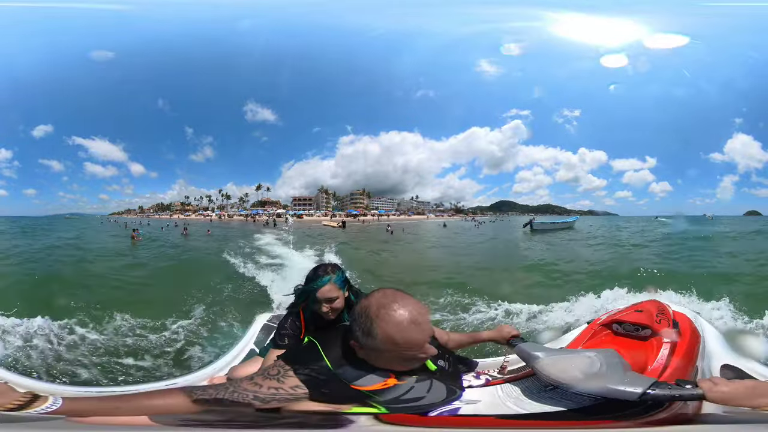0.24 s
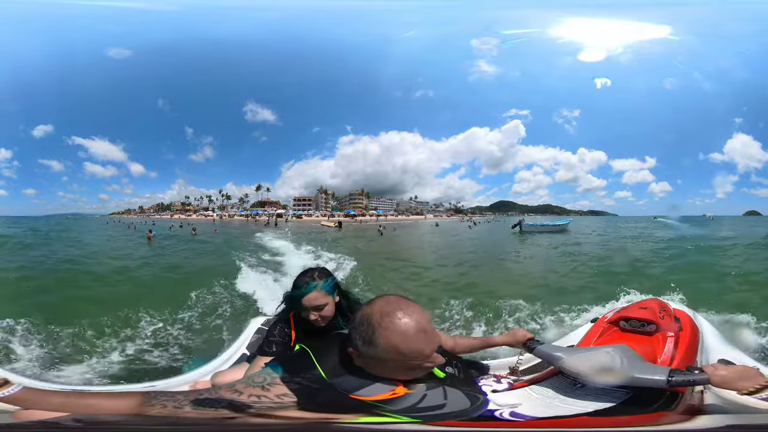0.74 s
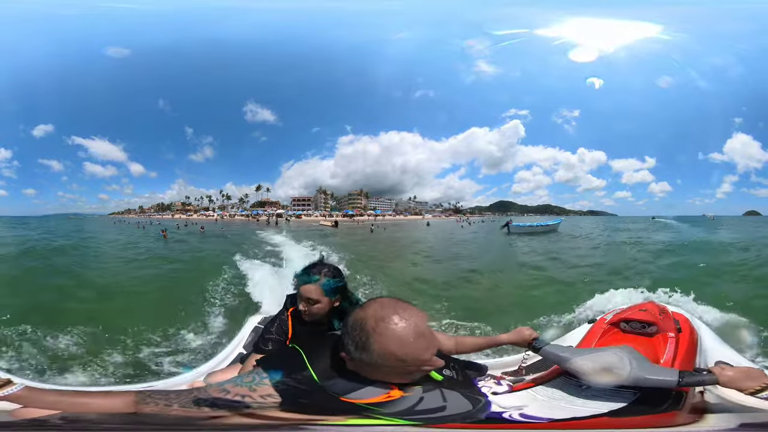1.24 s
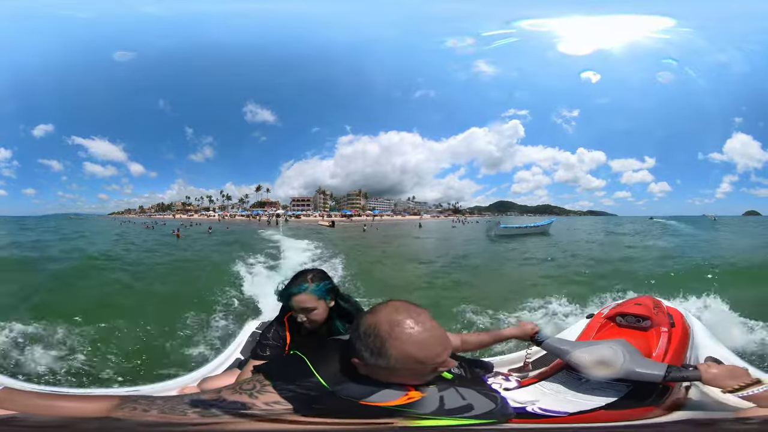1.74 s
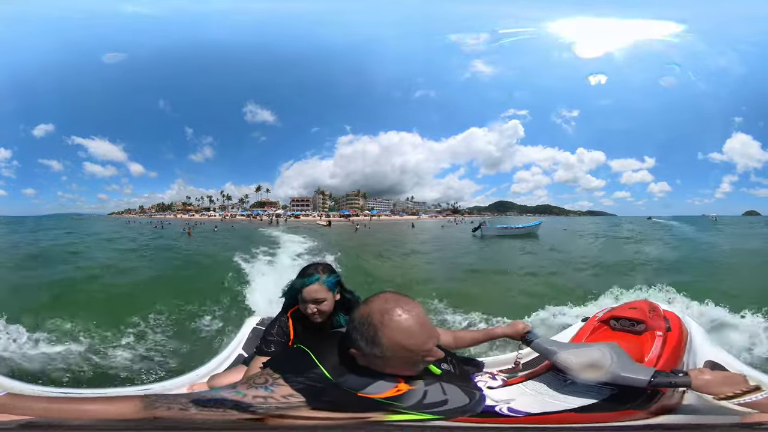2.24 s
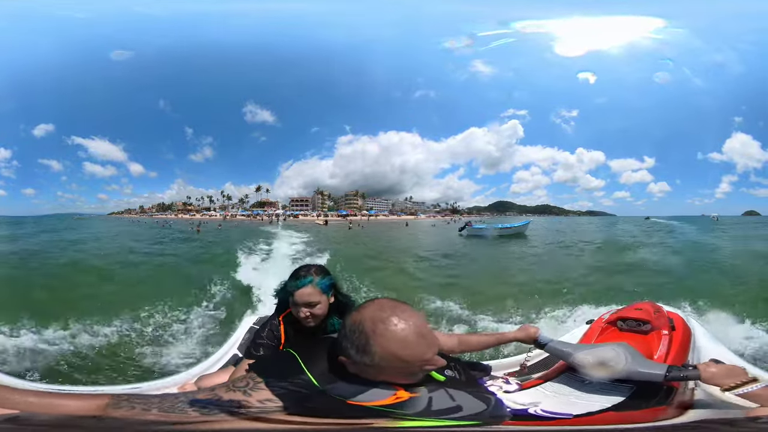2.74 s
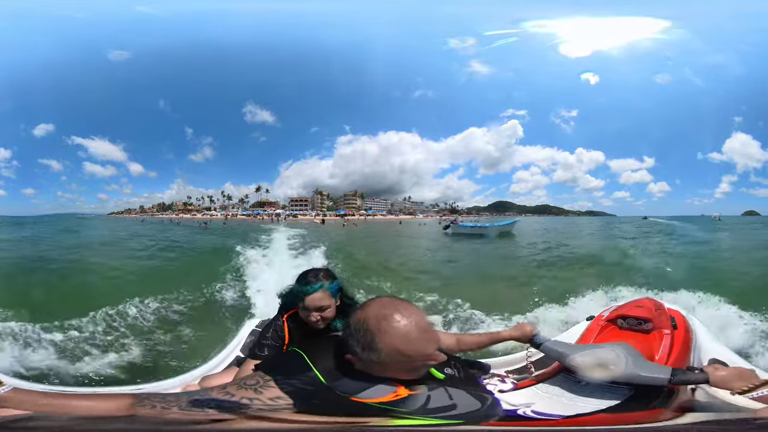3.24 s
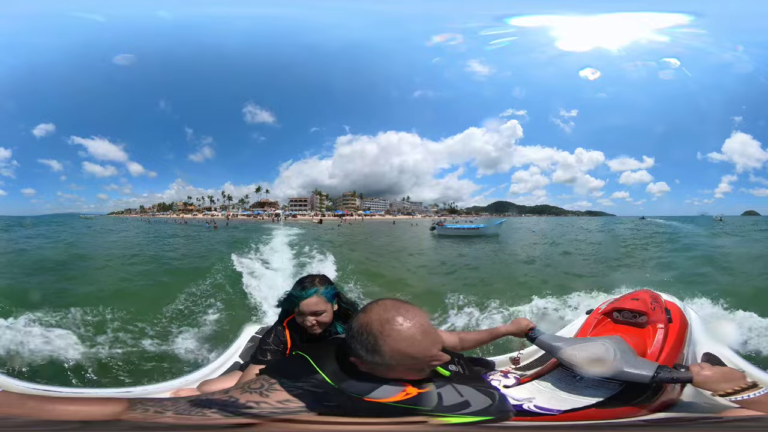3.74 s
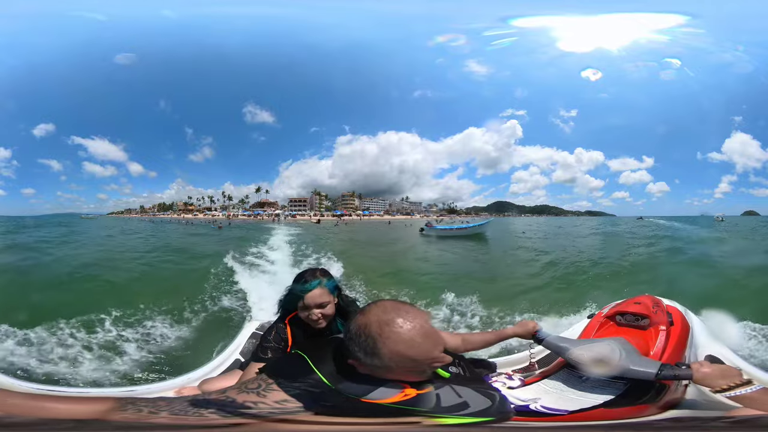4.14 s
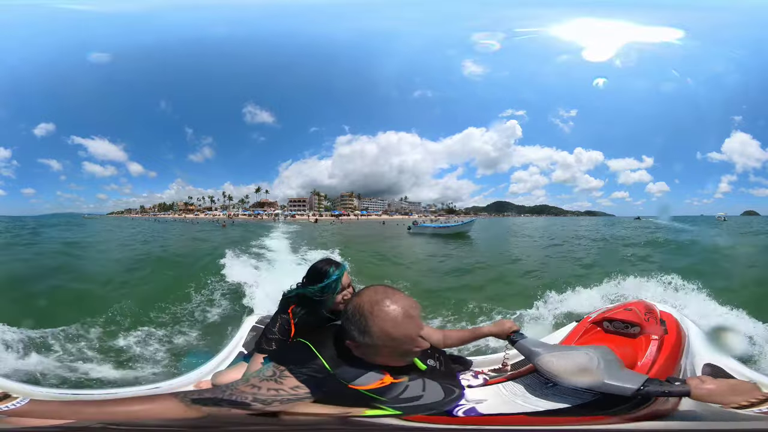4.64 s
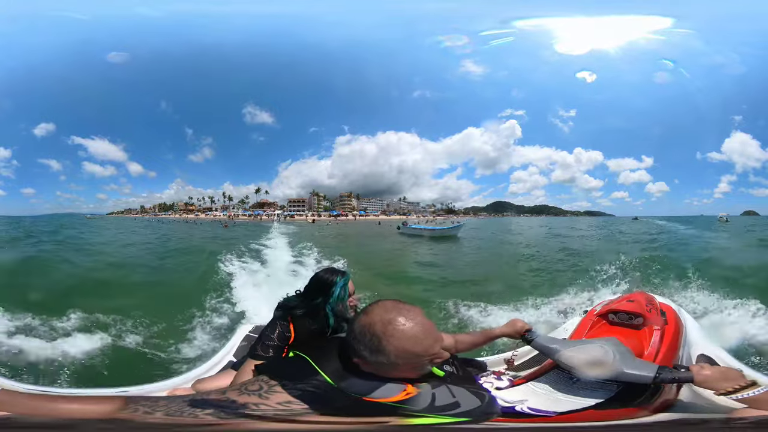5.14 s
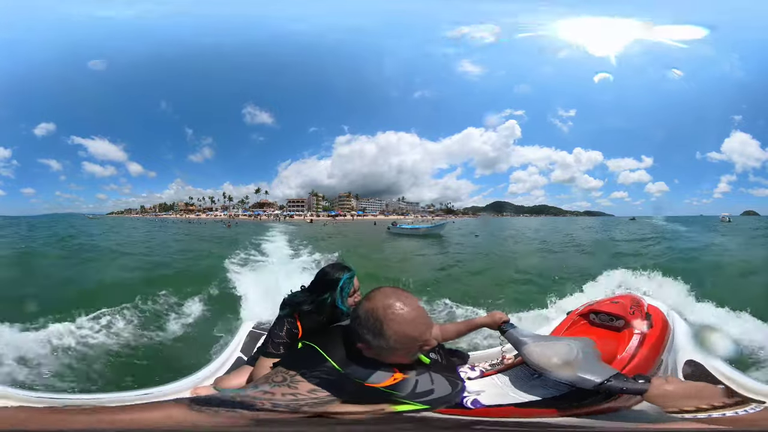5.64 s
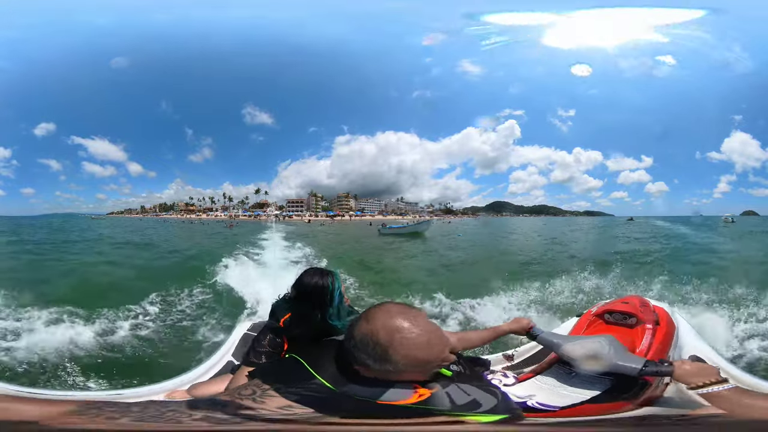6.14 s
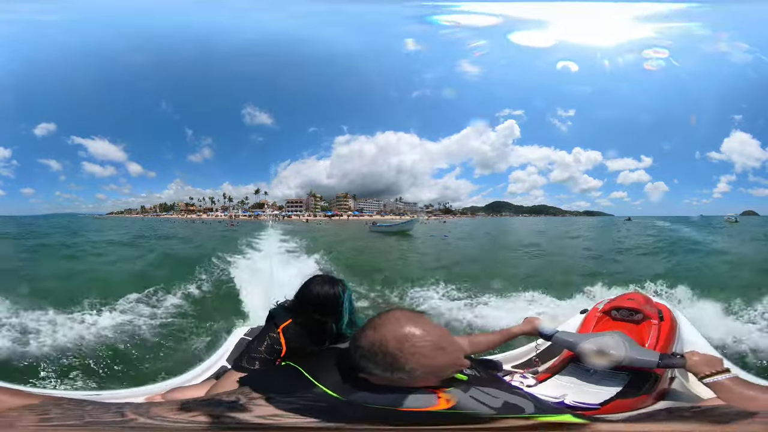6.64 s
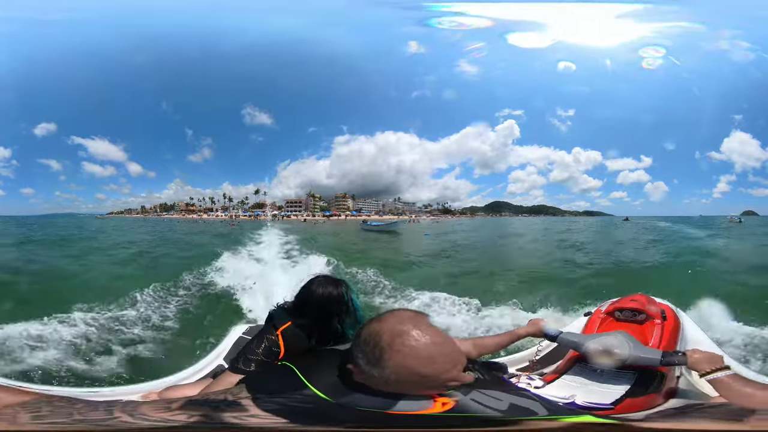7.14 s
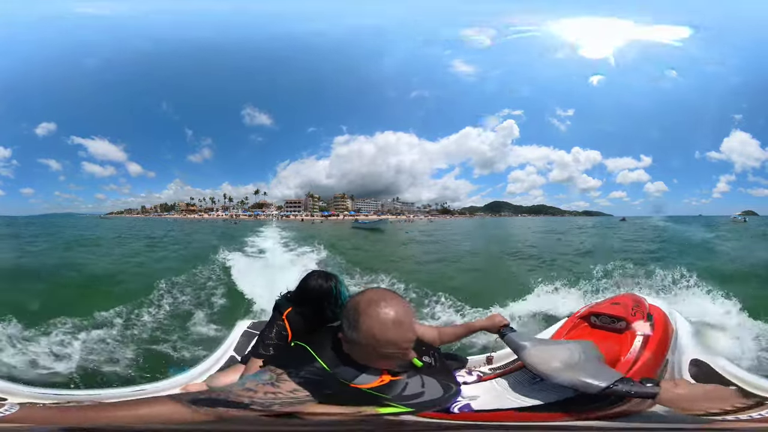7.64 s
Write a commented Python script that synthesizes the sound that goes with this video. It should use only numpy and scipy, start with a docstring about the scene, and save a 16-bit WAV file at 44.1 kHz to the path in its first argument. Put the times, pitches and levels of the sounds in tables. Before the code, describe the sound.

Jet ski speeding across an open bay, gusty wind thumping the microphone, then a strong wavering engine hum over roaring wash and hissing spray.

```python
"""A jet ski at speed on an open bay, heard by a small camera held over the seat.
It opens gusty: wind pops and thumps the open microphone, faint squeaks glide, and the hum soon all but vanishes.
The hum returns, then the camera changes to its sheltered microphone: the hum comes forward, the treble gets a hollow.
From there a thin whine, gurgles and hull rings join in, with brief dips in the hum and droplets close by.
Throughout, sines follow the engine speed; shaped noise makes the buffeting wind, roaring wash and hissing spray."""
import sys
import numpy as np
from scipy import signal
from scipy.fft import rfft, irfft, next_fast_len
from scipy.io import wavfile
from scipy.ndimage import uniform_filter1d

SR = 44100
rng = np.random.default_rng(int(sys.argv[2]) if len(sys.argv) > 2 else 0)


def output_pcm(signal):
    """Save a mono or channel-first signal as 16-bit PCM at the path in sys.argv[1].

    Samples are clipped to [-1, 1] before scaling.
    """
    pcm = np.clip(np.atleast_2d(signal).T, -1, 1) * 32767
    wavfile.write(sys.argv[1], SR, np.round(pcm).astype(np.int16))


N = 347508
T = np.arange(N) / SR
CHANGE_S = (2.36, 2.64)  # start and end of the change from the open to the sheltered microphone

# All levels in dB are those ahead of the camera's gain control.
# Wind on the microphone: start_s, buffeting_db, rumble_over_buffeting_db
WIND = [(0.0, -33.5, 1.5), (0.35, -31.5, 4.5), (0.9, -31, 2), (1.7, -28.5, 2.5), (2.3, -33.5, 1.5),
        (2.6, -27.5, -7), (3.3, -27.5, -3), (3.9, -28, -5), (4.4, -26, 0), (4.8, -26, -1), (5.4, -29, -1.5),
        (5.65, -25.5, -7), (6.0, -29, -6), (7.0, -27.5, -1.5), (7.88, -29, -3)]
# The hull cuts a wave and throws water: peak_s, spray_db, wash_db, rise_db_per_s, fall_db_per_s (spray slopes)
SPLASHES = [(0.091, -50.5, -42, 78, 16.5), (0.38, -57, -44.5, 16, 117), (0.67, -52, -51.5, 26, 31),
            (1.11, -50.5, -42.5, 36, 75), (1.26, -50, -45, 194, 81), (1.54, -50, -43, 35, 13.5),
            (1.97, -61.5, -60, 54, 75), (2.332, -50, -54.5, 79, 72), (2.5, -52.5, -41.5, 45, 43),
            (2.76, -51, -38.5, 38, 56), (3.15, -53.5, -38, 18.5, 51), (3.42, -49, -38, 96, 58),
            (3.86, -52.5, -36.5, 27.5, 29), (4.4, -55.5, -42.5, 16, 41), (4.89, -48, -34, 30.5, 46.5),
            (5.25, -48.5, -36.5, 46.5, 17.5), (5.7, -58.5, -42.5, 10.5, 25.5),
            (6.29, -45, -36.5, 45.5, 21.5), (7.0, -55, -42.5, 24, 36.5), (7.451, -57, -40.5, 20.5, 3)]


def undb(db):
    """Amplitude of a level in dB."""
    return 10 ** (np.asarray(db) / 20)


def unit(x):
    """Scale to rms 1."""
    return x / np.sqrt(np.mean(x ** 2))


def curves(rows):
    """Every column of a table, after its times, as a value per sample."""
    s, *columns = np.transpose(rows)
    return [np.interp(T, s, c) for c in columns]


def walk(rate):
    """Random levels held 1 / rate s and slewed twice; rms 1."""
    k = int(SR / rate)
    steps = np.repeat(rng.standard_normal(N // k + 1), k)
    slewed = uniform_filter1d(uniform_filter1d(steps, k), k)
    return unit(slewed[:N])


def bumps(s, db, length, edge):
    """Sum of smooth swells or dips in dB; edge 1 is pointed, 2 rounded, more is flatter with steeper sides."""
    return sum(d * np.exp(-np.abs(2 * (T - a) / w) ** edge) for a, d, w in zip(s, db, length))


def rush(colour, shared_db, shared_rate, own_db, own_rate, grain_db, grain_rate):
    """Coloured noise made of uneven grains, in half-octave bands that throb together and flicker alone; rms 1."""
    size = next_fast_len(N)
    octave = np.log2(np.arange(1, size // 2 + 2) * SR / size)
    hz, db = np.transpose(colour)
    grains = undb(grain_db * walk(grain_rate)) * rng.standard_normal(N)
    colour_gain = undb(np.interp(octave, np.log2(hz), db, left=-200, right=-200))
    spectrum = rfft(grains, size) * colour_gain
    out = 0
    for centre in np.arange(np.log2(hz[0]), np.log2(hz[-1]) + .5, .5):
        band = np.clip(1 - 2 * np.abs(octave - centre), 0, 1)  # triangles that overlap their neighbours
        out = out + undb(own_db * walk(own_rate)) * irfft(spectrum * band, size)[:N]
    return unit(out * undb(shared_db * walk(shared_rate)))


def engine():
    """A three-cylinder four-stroke: the firing tone rules; shaft turn, overtones and whine follow its speed."""
    # engine speed: start_s, firing_rate_hz
    speed_rows = [(0.0, 144.5), (0.74, 145), (2.1, 158.5), (2.6, 157.2), (3.3, 158.2), (3.85, 158.5),
                  (3.97, 155), (4.1, 158.2), (4.4, 159.3), (4.75, 162.3), (5.1, 162.5), (5.18, 166.5),
                  (5.35, 169.2), (5.5, 168.7), (5.72, 171.9), (5.87, 170), (6.13, 168.6), (6.3, 170.3),
                  (6.52, 170), (6.72, 171.8), (6.95, 169.9), (7.26, 171.8), (7.51, 171.3), (7.7, 169.2),
                  (7.88, 170.2)]
    # hum, buried while the open microphone faces the wind: start_s, level_db
    hum_rows = [(0.03, -36), (0.15, -20.5), (0.4, -35), (0.65, -27.5), (0.74, -28.5), (0.8, -60),
                (2.02, -60), (2.12, -28), (2.31, -27.5), (2.47, -22.5), (3.3, -19.5), (3.55, -21),
                (3.75, -18.5), (4.1, -18.5), (4.35, -22), (4.57, -19.5), (5.1, -22), (5.42, -19),
                (6.3, -22), (6.8, -19.5), (7.2, -22), (7.88, -19.5)]
    # the hum drops out briefly: centre_s, depth_db, length_s
    dip_rows = [(3.18, 6, 0.093), (3.622, 6.5, 0.11), (3.926, 12, 0.25), (4.26, 9.5, 0.11),
                (4.783, 14, 0.24), (5.167, 11.5, 0.15), (5.3, 4, 0.1), (5.522, 9.5, 0.11),
                (6.23, 3.5, 0.15), (6.954, 7, 0.084), (7.706, 3, 0.1)]
    # shaft turn and overtones: multiple_of_firing_rate, level_over_hum_db
    order_rows = [(2 / 3, -16), (1.5, -23), (3, -28), (6, -36.5)]
    # thin whine from the drive: start_s, level_db
    whine_rows = [(2.3, -66.), (4.2, -66.), (4.35, -57.), (4.62, -58.), (4.75, -66.), (5.15, -64.),
                  (5.55, -59.), (5.72, -63.), (5.87, -57.), (6.05, -60.), (6.15, -70.), (6.95, -70.),
                  (7.08, -62.), (7.17, -70.), (7.62, -67.), (7.75, -57.)]
    whine_order = 10.49  # multiple of the firing rate

    s, depth_db, length = np.transpose(dip_rows)
    firing_hz = curves(speed_rows)[0]
    hum_db = curves(hum_rows)[0] - bumps(s, depth_db, length, edge=2.2)
    phase = 2 * np.pi * np.cumsum(firing_hz * (1 + 0.0015 * walk(12))) / SR
    tone = undb(1.7 * walk(14)) * np.sin(phase)
    for order, over_hum_db in order_rows:
        # the weaker orders reach the microphone by unsteady paths, so they waver
        level = undb(over_hum_db + 3.0 * walk(9))
        tone = tone + level * np.sin(order * phase + 0.79 * walk(15))
    whine_level = undb(curves(whine_rows)[0] + 2.0 * walk(10))
    whine = whine_level * np.sin(whine_order * phase + 0.4 * walk(30))
    whine = whine * (T > whine_rows[0][0])  # silent ahead of its first row
    return np.sqrt(2) * (undb(hum_db) * tone + whine)  # a sine of rms 1 peaks at root 2


def wind():
    """Eddies beat on the membrane; the slow rumble swells apart from the quicker buffeting."""
    # noise colour of the wind: frequency_hz, density_db_per_hz (relative)
    wind_colour = [(15, -28), (30, -9.5), (50, -2), (110, -1), (155, -2), (230, -2), (400, -5.5),
                   (650, -14), (730, -17.5), (1500, -38.5), (3000, -71.5)]
    # gusts (above 0 dB) and lulls (below): centre_s, buffeting_db, rumble_over_buffeting_db, length_s
    gust_rows = [(0.278, -10, -3, 0.056), (0.356, -1, 7, 0.032), (0.725, 5, 0.5, 0.078),
                 (0.851, 8, 11, 0.016), (0.883, -5.5, -3, 0.05), (0.956, -1.5, 6, 0.045),
                 (1.004, -1, -6, 0.076), (1.169, 6, 11.5, 0.054), (1.233, -7, -11, 0.073),
                 (1.292, 6, 4.5, 0.039), (1.512, -4.5, -7, 0.034), (1.707, -5, -5, 0.035),
                 (1.804, -4.5, -1, 0.047), (1.93, -8, -4, 0.068), (1.971, 6.5, 8, 0.019),
                 (1.999, -6, -9, 0.024), (2.098, 6, 4, 0.037), (2.2, -4, -3, 0.11), (2.273, 11.5, 6, 0.032),
                 (2.302, -6, -13, 0.035), (3.917, 2.5, 6, 0.37), (4.285, 3, -4, 0.069),
                 (4.393, 0, -16, 0.077), (4.593, -1, -10, 0.12), (4.86, 1.5, -2, 0.058),
                 (5.298, 3, 9.5, 0.077), (6.783, -5.5, -4, 0.14)]
    edge = 3.6  # flat gusts with steep sides

    buffet_db, rumble_db = curves(WIND)
    s, gust_db, gust_rumble_db, length = np.transpose(gust_rows)
    exposed = np.interp(T, CHANGE_S, (1.3, 1))  # the open microphone takes the eddies as separate blows
    air = rush(wind_colour, shared_db=0.35 * exposed, shared_rate=37, own_db=1.3, own_rate=12,
               grain_db=1.34 * exposed, grain_rate=150)
    low = signal.sosfiltfilt(signal.butter(3, 150., fs=SR, output="sos"), air)
    rumble = undb(rumble_db + bumps(s, gust_rumble_db, length, edge)) * unit(low)
    buffeting = undb(bumps(s, gust_db, length, edge)) * unit(air - low)
    return undb(buffet_db) * (rumble + buffeting)


def pops():
    """Each pop shakes the membrane for one to a few quick cycles; the strongest add a shorter ring at the peak."""
    # strongest wind pops: start_s, peak_db, pitch_hz, overtone_over_pop_db, cycles_to_peak
    pop_rows = [(0.358, -16.5, 480, -13, 2), (0.422, -16, 210, -30, .55), (0.851, -16.5, 355, -15, 0.8),
                (1.068, -21, 366, -16, 0.9), (1.181, -16.5, 470, -2, 1.6), (1.302, -19, 530, -14, 1.3),
                (1.605, -14, 190, -30, .55), (1.747, -14, 280, -25, .55), (1.765, -18, 400, -20, 1.2),
                (1.879, -16, 300, -22, .8), (2.029, -17, 300, -20, .6), (2.086, -19, 388, -15, 1),
                (2.1, -17.5, 410, -14, 1), (2.235, -20, 468, -13, 1.2), (2.271, -21, 385, -15, 1.8),
                (4.455, -18, 528, -10, 0.9), (5.236, -19, 350, -7, 2), (5.674, -19, 382, -11, 1)]
    # lesser thumps while the open microphone faces the wind
    thumps_per_s, thump_hz, thump_db, thump_cycles = 22, (170., 326), (-27.5, -17), .55
    overtone_hz, overtone_sag = 1650, 0.33  # middle of the ring's start pitches; share it sags by the peak

    out, t = np.zeros(N), np.arange(1536) / SR
    thumps = []
    for when, size, pitch in rng.random((int(thumps_per_s * CHANGE_S[0]), 3)):
        db = np.interp(size ** 2, (0, 1), thump_db)  # squared: more weak ones than strong
        hz = np.interp(pitch, (0, 1), thump_hz)
        thumps.append((when * CHANGE_S[0], db, hz, -np.inf, thump_cycles))  # no overtone
    chance = rng.random((len(pop_rows) + len(thumps), 2))
    for (s, db, hz, over_db, rise), (start, spread) in zip(pop_rows + thumps, chance):
        cycles = t * hz
        swell = (cycles / rise * np.exp(1 - cycles / rise)) ** 2
        ring_hz = overtone_hz * (.9 + .2 * spread) * (1 - overtone_sag) ** (cycles / rise)
        turns = np.cumsum(ring_hz) / SR
        over = undb(over_db) * swell ** 2 * np.sin(2 * np.pi * (turns + start))
        push = np.sign(start - .5) * np.cos(2 * np.pi * (cycles - rise))  # inwards or outwards
        i = int(s * SR)
        out[i:i + len(t)] += undb(db) * swell * (push + over)
    return out


def water():
    """A dull roar from the hull, hissing spray and fine droplets; the spray's colour follows the microphone."""
    # noise colour of the hull wash: frequency_hz, density_db_per_hz (relative)
    wash_colour = [(200, -17.5), (500, 1), (800, -1.5), (1200, -6), (2000, -11.5), (3000, -22),
                   (4200, -46.5), (6000, -69.5)]
    # spray through the open microphone: frequency_hz, density_db_per_hz (relative)
    open_colour = [(1470, -27), (2500, -1.5), (2980, -2.5), (4990, -4), (6110, -3.5), (8160, -16),
                   (8990, -34), (11700, -63), (19800, -120)]
    # spray through the sheltered microphone, with its hollow: frequency_hz, density_db_per_hz (relative)
    sheltered_colour = [(1650, -20.5), (2800, -2), (3680, -7.5), (4300, -19), (4810, -22.5), (5130, -19.5),
                        (6580, -0.5), (7430, 1), (8190, -6.5), (8990, -23), (11700, -47.5), (19800, -120)]
    far_roar_db, far_hiss_db = -54.5, -67  # steady wake further back

    _, spray_db, wash_db, *_ = np.transpose(SPLASHES)
    sheltered = np.interp(T, CHANGE_S, (0, 1))
    open_wash = rush(wash_colour, shared_db=0.84, shared_rate=14, own_db=1.5, own_rate=20,
                     grain_db=0.5, grain_rate=520)
    sheltered_wash = rush(wash_colour, shared_db=0.5, shared_rate=10, own_db=1.0, own_rate=10.5,
                          grain_db=0.26, grain_rate=230)
    open_spray = rush(open_colour, shared_db=0.8, shared_rate=40, own_db=1.3, own_rate=50,
                      grain_db=1.5, grain_rate=400)
    sheltered_spray = rush(sheltered_colour, shared_db=-0.1, shared_rate=15, own_db=1.2, own_rate=25,
                           grain_db=1.0, grain_rate=600)
    wash = np.sqrt(1 - sheltered) * open_wash + np.sqrt(sheltered) * sheltered_wash
    spray = (1 - sheltered) * open_spray + np.sqrt(sheltered) * sheltered_spray
    # the wash rises and falls more gently than the spray
    roar = np.sqrt(splashing(wash_db, slope_share=0.68) + undb(far_roar_db) ** 2)
    hiss = np.sqrt(splashing(spray_db, slope_share=1) + undb(far_hiss_db) ** 2)
    return roar * wash + hiss * spray + drops(sheltered * hiss)


def splashing(peak_db, slope_share):
    """Power of all splashes together; each climbs to its peak and dies away at its own rates."""
    s, _, _, rise, fall = np.transpose(SPLASHES)
    power = 0
    for peak_s, db, up, down in zip(s, peak_db, rise, fall):
        slope_db = np.minimum(up * (T - peak_s), -down * (T - peak_s))
        power = power + undb(db + slope_share * slope_db) ** 2
    return power


def drops(spray_level):
    """Droplets tick brightly: many small ones that follow the spray and a few loud ones."""
    # loudest single droplets near the microphone: start_s, peak_db, pitch_hz
    loud_rows = [(3.108, -36, 7600), (3.111, -41, 7300), (3.245, -43, 7270), (6.283, -40, 6800),
                 (6.292, -36, 7360), (6.355, -41, 6700)]
    # the small ones: rate, pitch range, range of level over the spray
    drops_per_s, drop_hz, over_spray_db = 160, (6900, 8300), (-4, 5)
    rise_s = 0.00045  # from the start of a tick to the peak of its swell

    out, t = np.zeros(N + 256), np.arange(256) / SR
    when, pitch, size = rng.random((int(drops_per_s * N / SR), 3)).T
    at = (when * N).astype(int)
    peak = spray_level[at] * undb(np.interp(size ** 2, (0, 1), over_spray_db))
    small = zip(at, peak, np.interp(pitch, (0, 1), drop_hz))
    loud = [(int(s * SR), undb(db), hz) for s, db, hz in loud_rows]
    swell = t / rise_s * np.exp(1 - t / rise_s)
    for i, gain, hz in [*small, *loud]:
        out[i:i + len(t)] += gain * swell * np.sin(2 * np.pi * hz * t)
    return out[:N]


def hull():
    """Once sheltered, the microphone hears gurgles that glide up and the wavering rings of the hull."""
    # narrow resonances that the wash shakes: pitch_hz, width_hz, level_db
    ring_rows = [(552, 22, -46.), (590, 24, -49.), (655, 26, -47.)]
    # water gurgles under the hull: rate, pitch range, cycles to the peak, upward glide per cycle (share)
    gurgles_per_s, (low_hz, high_hz), rise, glide = 30, (240., 720.), 3.5, .012
    over_buffeting_db = (-11., -1.5)  # peak range at the lowest pitch; higher gurgles are weaker

    out, t = np.zeros(N + 4096), np.arange(4096) / SR
    buffeting = undb(curves(WIND)[0])
    for when, size, pitch in rng.random((int(gurgles_per_s * N / SR), 3)):
        i = int(when * N)
        hz = low_hz * (high_hz / low_hz) ** pitch
        cycles = t * hz
        swell = (cycles / rise * np.exp(1 - cycles / rise)) ** 2
        peak = buffeting[i] * undb(np.interp(size, (0, 1), over_buffeting_db)) * np.sqrt(low_hz / hz)
        out[i:i + len(t)] += peak * swell * np.sin(2 * np.pi * cycles * (1 + glide * cycles / 2))
    rings = 0
    for hz, width, db in ring_rows:
        b, a = signal.iirpeak(hz, hz / width, fs=SR)
        ring = unit(signal.filtfilt(b, a, rng.standard_normal(N)))
        rings = rings + undb(db + 3 * walk(4)) * ring
    return np.interp(T, CHANGE_S, (0, 1)) * (out[:N] + rings)


def squeaks():
    """Faint, short gliding tones with an unsteady level."""
    # squeaks: start_s, length_s, start_hz, end_hz, level_db (of the peak, before the unsteadiness)
    squeak_rows = [(0.036, 0.08, 2150., 2200., -49.5), (1.022, 0.055, 1950., 1850., -47.5),
                   (1.072, 0.05, 2200., 1580., -46.5)]
    out, shaky = np.zeros(N), undb(4 * walk(250))
    for s, length, start_hz, end_hz, db in squeak_rows:
        n, i = int(length * SR), int(s * SR)
        fade = signal.windows.tukey(n, .8)
        turns = np.cumsum(np.linspace(start_hz, end_hz, n)) / SR
        out[i:i + n] += undb(db) * fade * np.sin(2 * np.pi * turns)
    return out * shaky


def scene():
    """All sources together at the microphone, on one channel."""
    return (engine() + wind() + pops() + water() + hull() + squeaks())[None]


def record(dry):
    """Quick gain control evens out the gusts, the highest peaks are rounded off and the top is cut."""
    threshold_db, ceiling, top_hz = -22., .36, 9150
    loud = np.sqrt(uniform_filter1d(dry ** 2, size=900, axis=1))  # rms over about 20 ms
    even = dry / np.maximum(loud / undb(threshold_db), 1) ** .3
    rounded = ceiling * np.tanh(even / ceiling)
    top_cut = signal.ellip(10, .2, 60, top_hz, fs=SR, output="sos")
    return signal.sosfilt(top_cut, rounded)


dry = scene()
out = record(dry)
output_pcm(out)
```